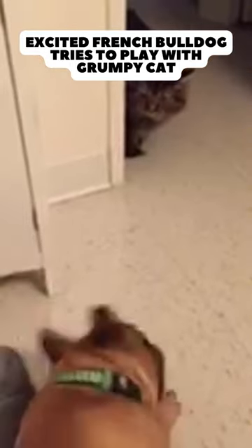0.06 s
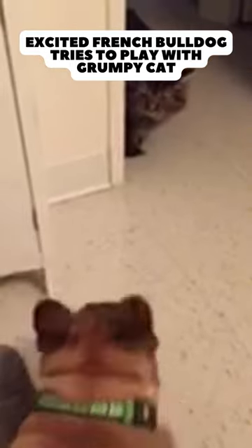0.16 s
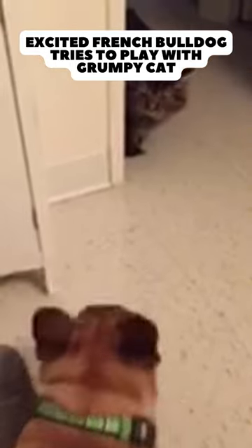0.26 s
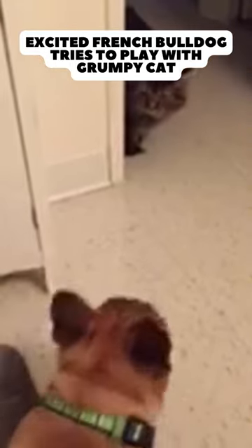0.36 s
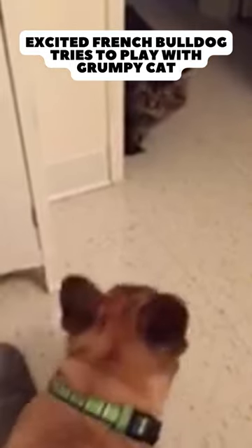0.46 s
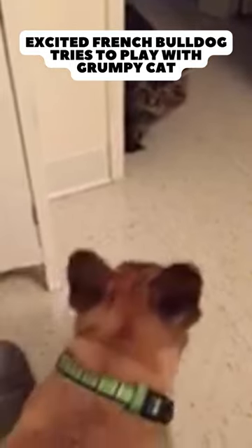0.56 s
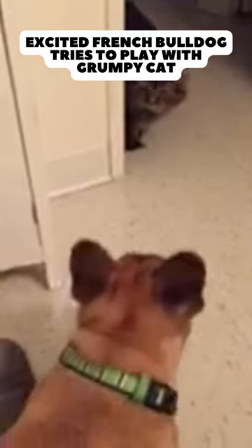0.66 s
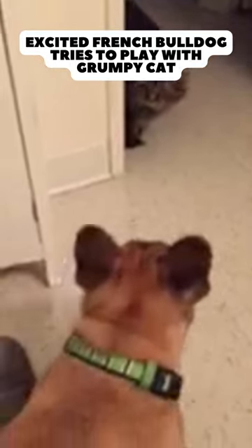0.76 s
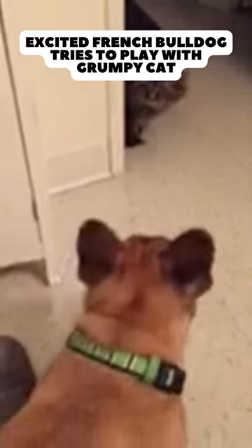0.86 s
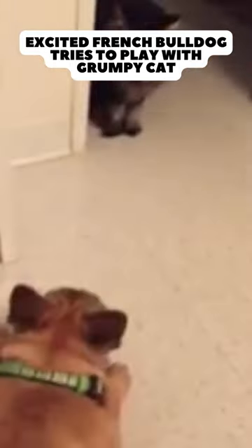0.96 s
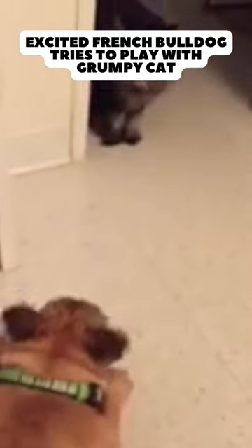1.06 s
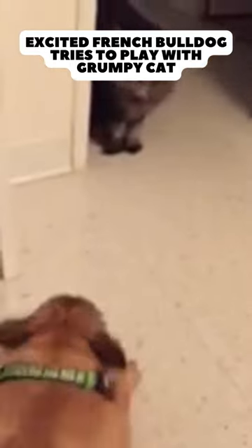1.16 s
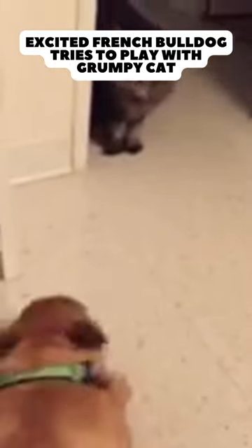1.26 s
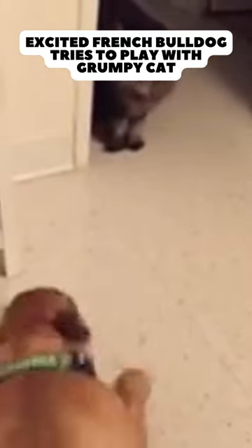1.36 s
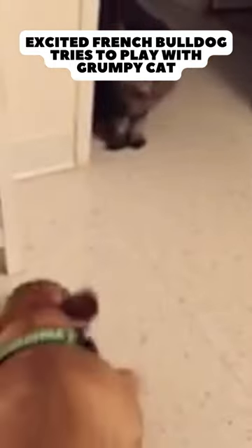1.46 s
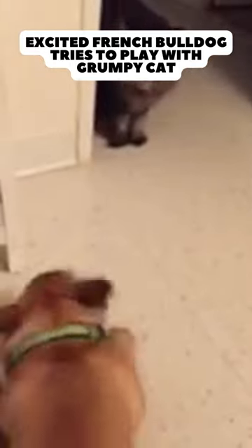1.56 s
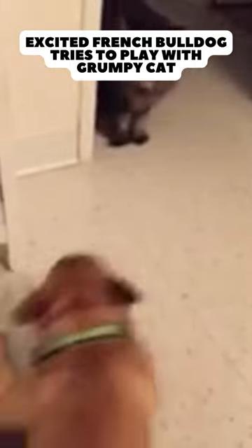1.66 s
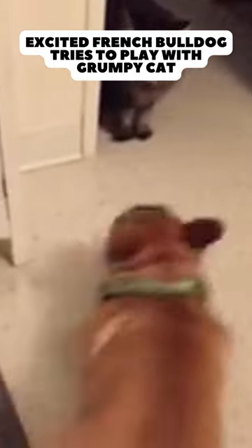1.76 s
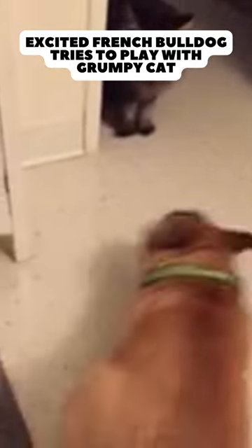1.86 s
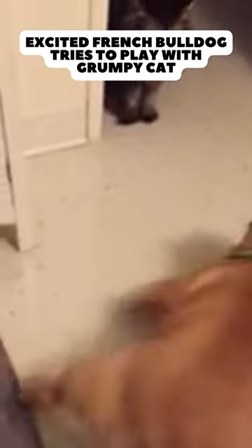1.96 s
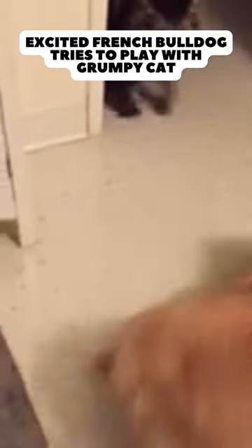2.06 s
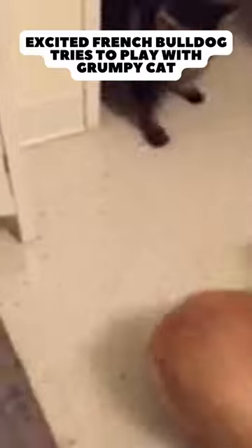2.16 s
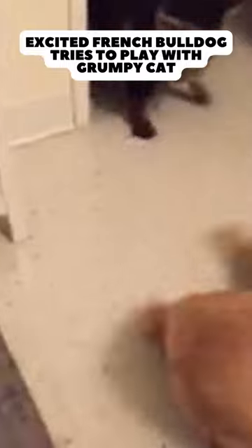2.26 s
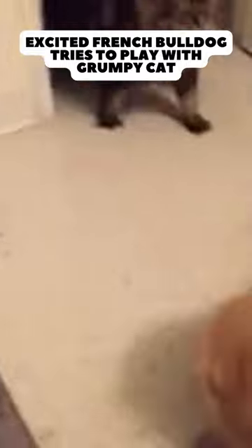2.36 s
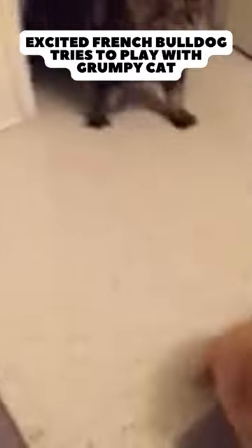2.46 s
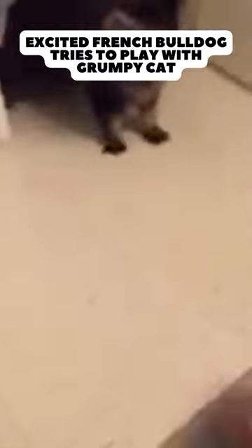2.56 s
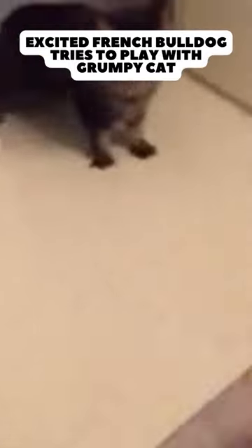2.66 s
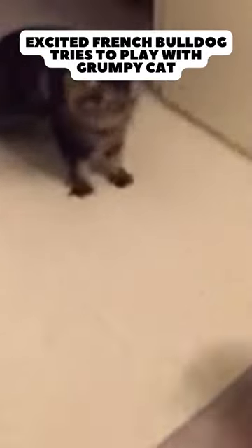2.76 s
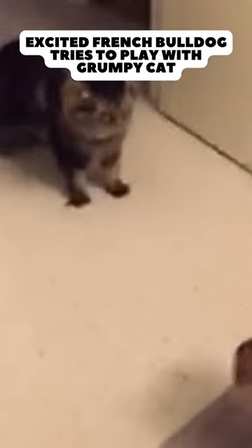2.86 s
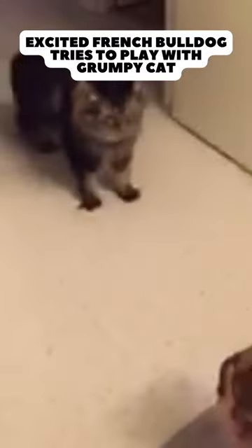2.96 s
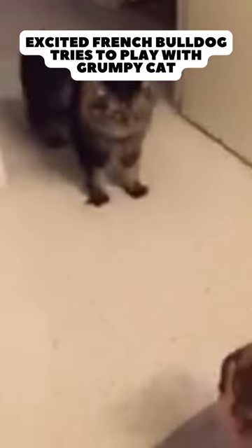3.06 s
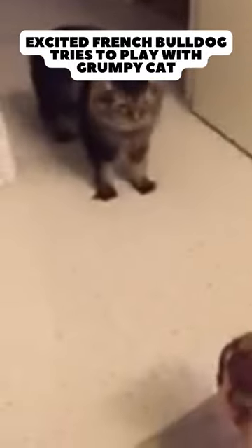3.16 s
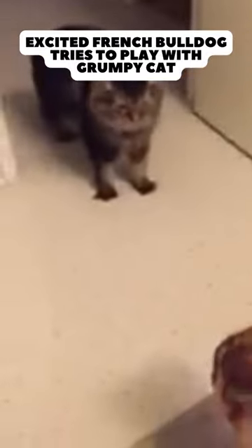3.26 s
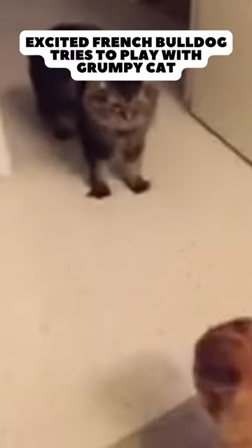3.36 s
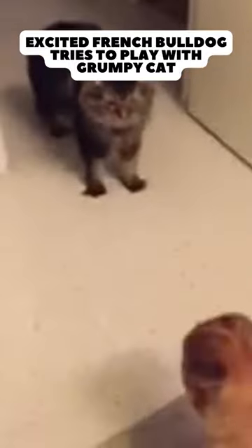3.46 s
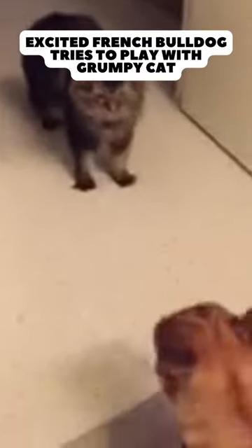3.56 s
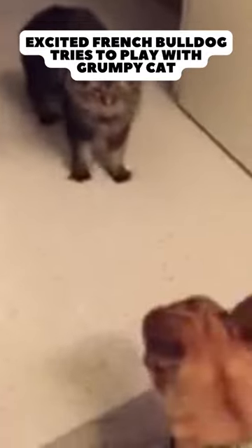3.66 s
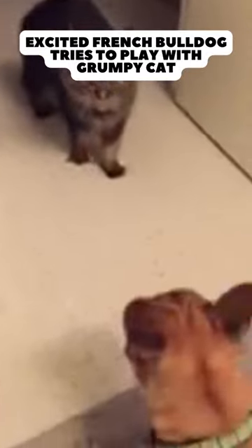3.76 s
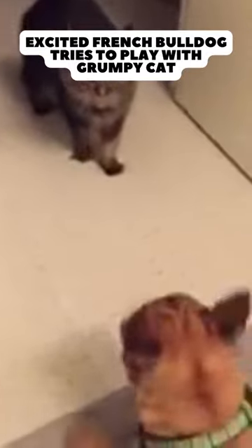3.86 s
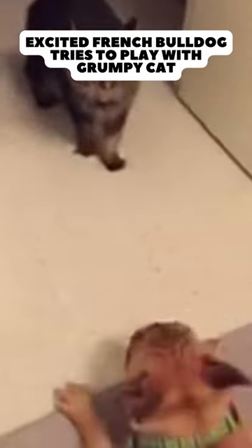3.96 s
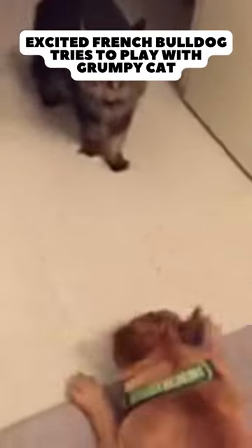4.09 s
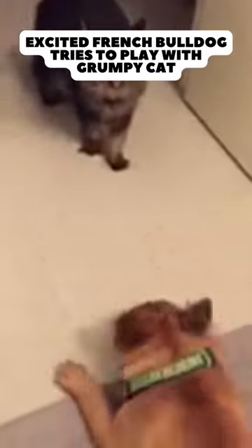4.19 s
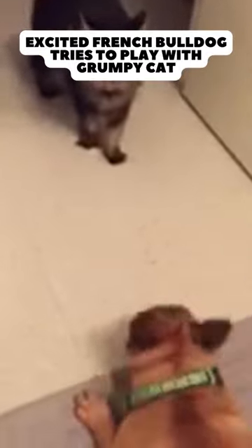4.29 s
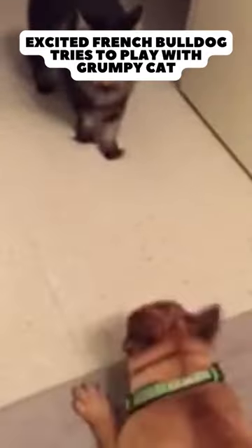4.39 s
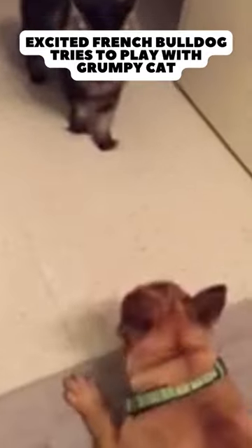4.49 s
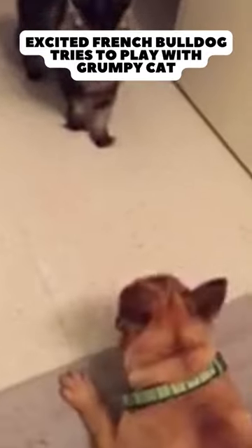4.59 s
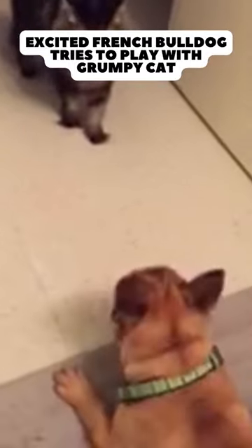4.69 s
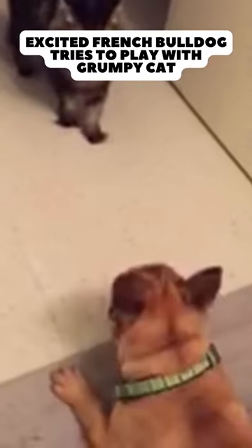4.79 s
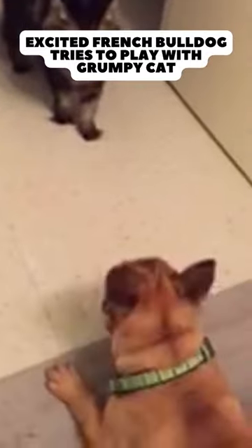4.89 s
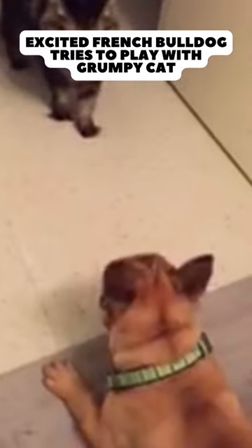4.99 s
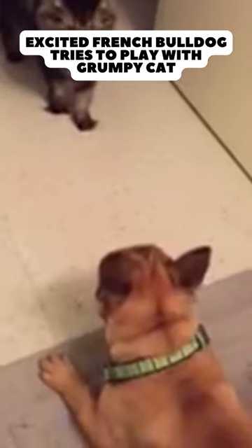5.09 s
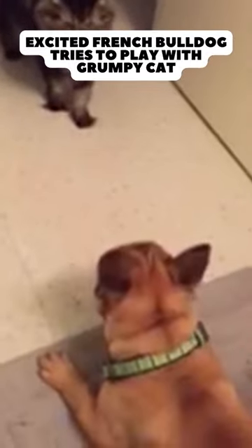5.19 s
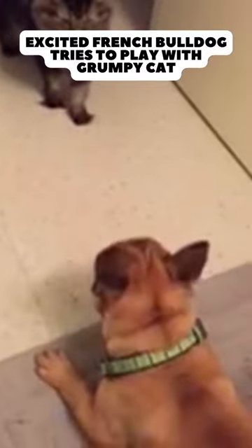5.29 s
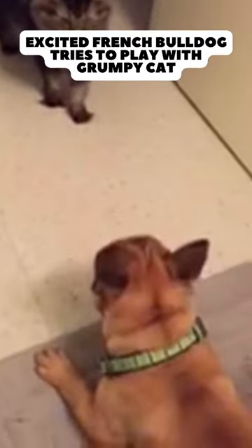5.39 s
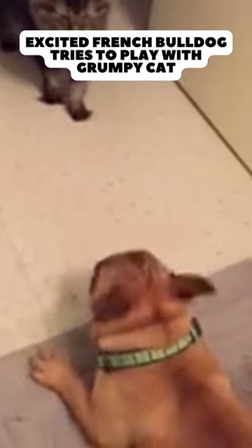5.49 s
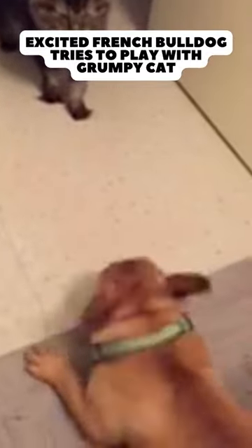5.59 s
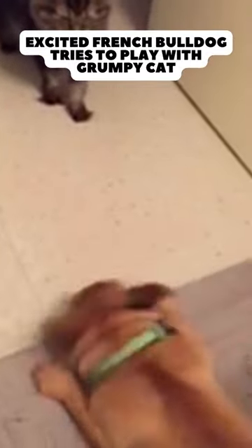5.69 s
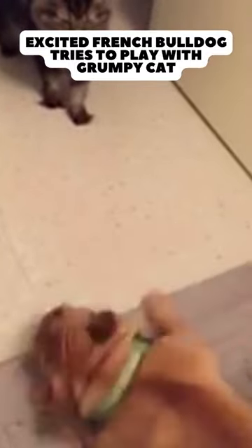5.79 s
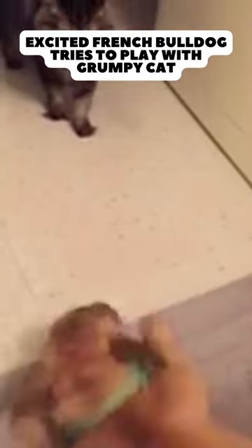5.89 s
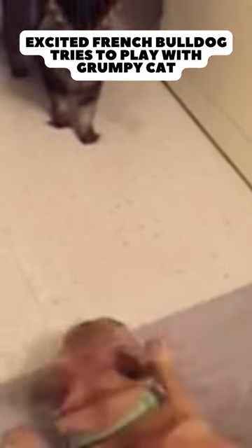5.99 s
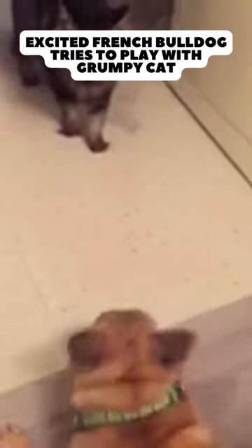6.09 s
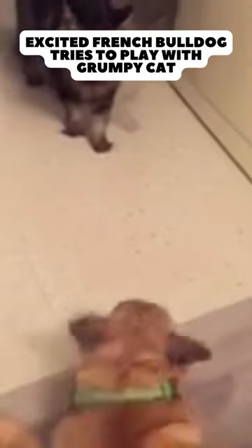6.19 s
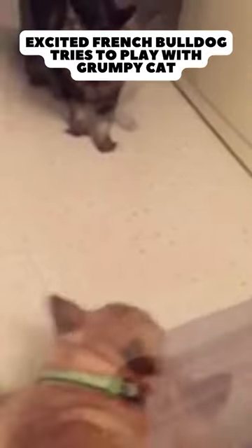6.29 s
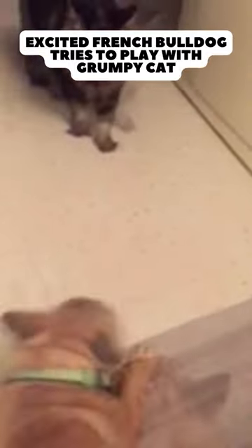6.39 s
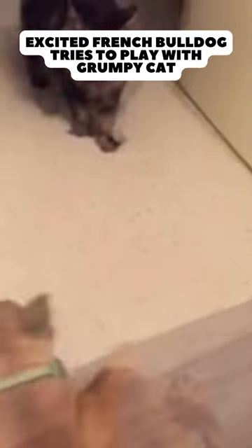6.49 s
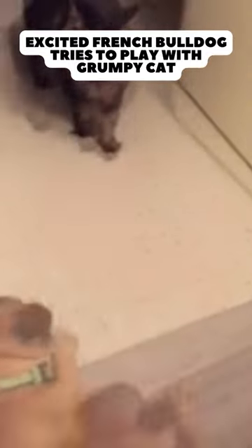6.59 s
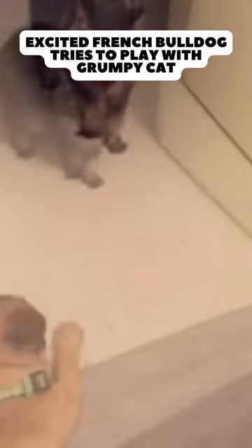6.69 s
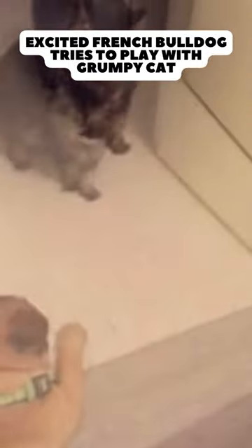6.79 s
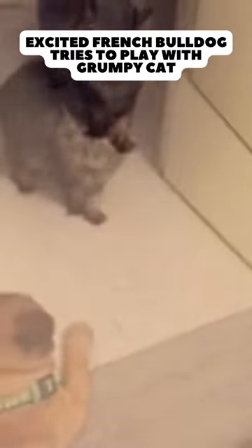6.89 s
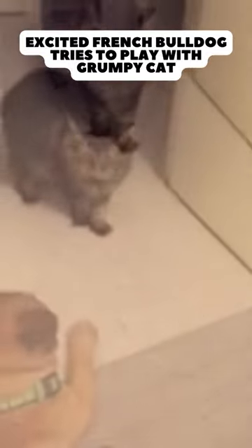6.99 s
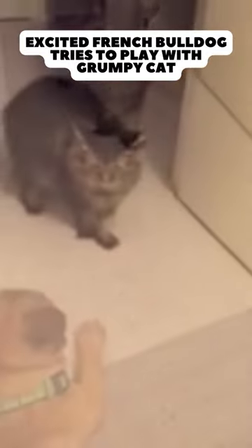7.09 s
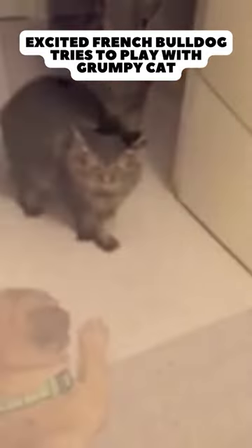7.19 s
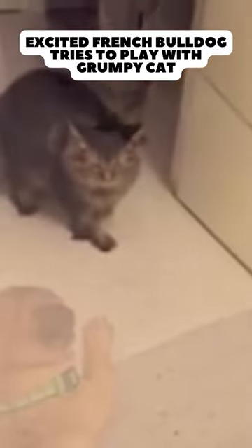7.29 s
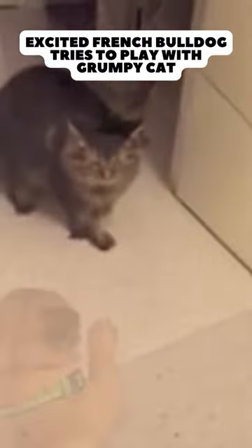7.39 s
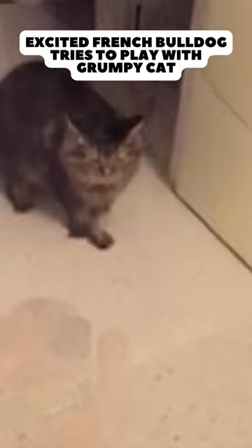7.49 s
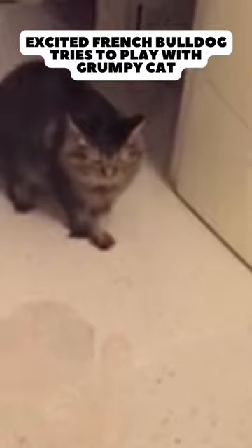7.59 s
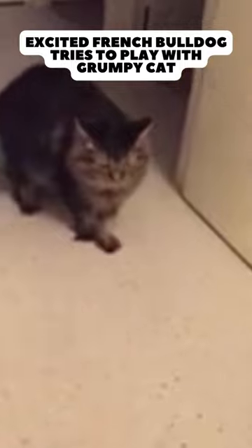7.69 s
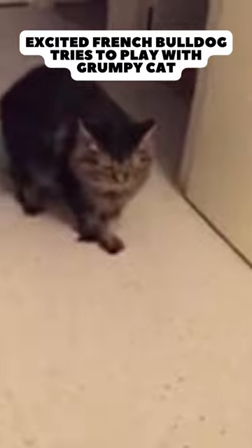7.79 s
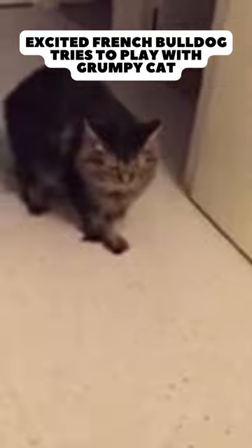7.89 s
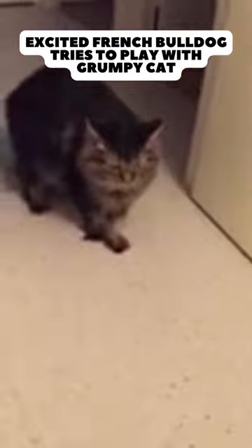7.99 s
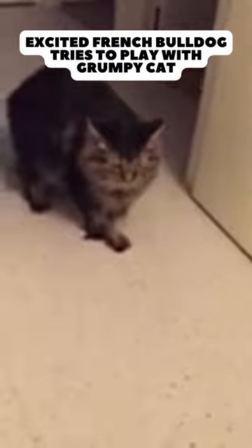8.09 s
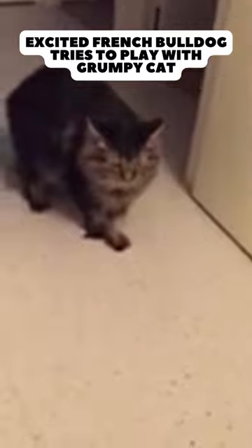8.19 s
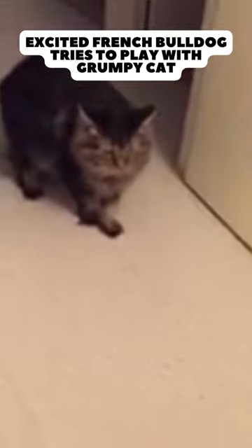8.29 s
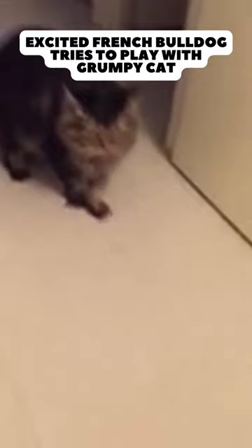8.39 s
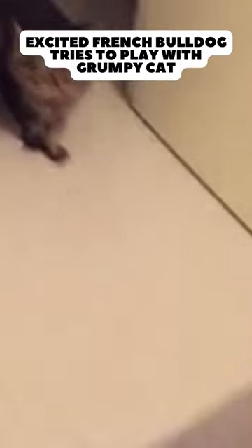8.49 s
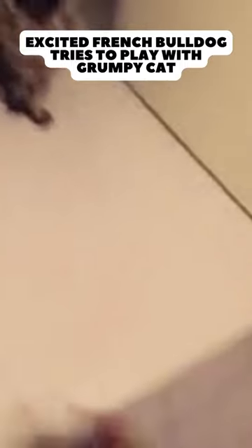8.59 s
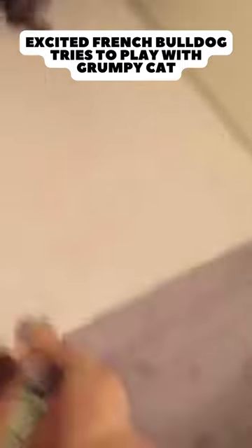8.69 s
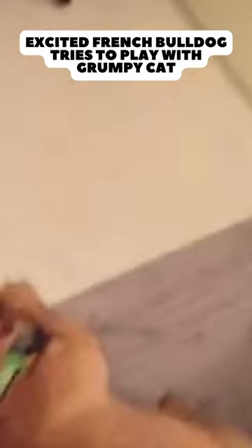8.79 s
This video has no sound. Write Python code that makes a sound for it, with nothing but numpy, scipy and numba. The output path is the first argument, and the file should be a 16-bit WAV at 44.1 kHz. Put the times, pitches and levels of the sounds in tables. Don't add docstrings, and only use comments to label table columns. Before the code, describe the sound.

Handheld phone capture indoors with short hard reflections: near, dry dog woofs, ragged huffs, a yap and scrabbling claws, then one wetter, distant cat yowl sliding down. A calm middle holds only soft nose whistles, sniffs and small whimpers. Then a loud bark, grumbles, a woof with paws slapping the floor, another bark, snorts, a brief low cat growl and closing woofs and yap, with a thin fridge whine rising.

```python
import sys
import numpy as np
from scipy import signal
from scipy.fft import rfft, irfft, next_fast_len
from scipy.io import wavfile
from scipy.ndimage import uniform_filter1d
from numba import njit

SR = 44100
rng = np.random.default_rng(int(sys.argv[2]) if len(sys.argv) > 2 else 0)


def put_to_file(sound):
    columns = np.atleast_2d(sound).T
    safe = np.clip(columns, -1, 1)
    whole_steps = np.round(safe * 32767)
    wavfile.write(sys.argv[1], SR, whole_steps.astype(np.int16))


def undo_db(level):
    steps = np.asarray(level, float) / 20
    return 10 ** steps


N = 390285
T = np.arange(N) / SR
M = next_fast_len(N)

# (frequency [Hz], density [dB per Hz])
HISS = [(1590, -28), (2700, -1.5), (3600, -3.5), (3850, -5.5), (4350, -9.5), (5600, -6), (6080, -11.5),
        (6690, -10.5), (11800, -21), (13800, -20)]


def level(x, db):
    return x * undo_db(db) / np.sqrt(np.mean(x ** 2))


def coloured(points):
    hz, db = np.transpose(points)
    f = np.fft.rfftfreq(M, 1 / SR) + 1
    gain = undo_db(np.interp(np.log(f), np.log(hz), db))
    return level(irfft(rfft(rng.standard_normal(M)) * gain, M)[:N], 0)


def walk(rate):
    k = int(SR / rate)
    held = np.repeat(rng.standard_normal(N // k + 1), k)
    return 1.4 * uniform_filter1d(uniform_filter1d(held, k), k)[:N]


def patchy(x, lo_hz, depth_db, rate, count=7):
    spectrum = rfft(x, M)
    octaves = np.log2(np.fft.rfftfreq(M, 1 / SR) / lo_hz + 1e-9)
    out = 0
    for k in range(count):
        share = np.clip(1 - abs(np.clip(4 * octaves, 0, count - 1) - k), 0, 1)
        out = out + undo_db(depth_db * walk(rate)) * irfft(spectrum * share, M)[:N]
    return level(out, 0)


def play(table):
    s, *columns = np.transpose(table)
    gate = np.clip(np.minimum(T - s[0] + 0.033, s[-1] + .01 - T) / 0.022, 0, 1)
    return gate, [np.interp(T, s, c) for c in columns]


@njit
def svf(x, hz, width):
    y, b, l = np.empty(len(x)), 0., 0.
    for i in range(len(x)):
        g, k = np.tan(np.pi * hz[i] / SR), width / hz[i]
        v = (b + g * (x[i] - l)) / (1 + g * (g + k))
        b, l, y[i] = 2 * v - b, l + 2 * g * v, k * v
    return y


def steep(x, hz, width):
    return level(svf(svf(x, hz, width), hz, width), 0)


def tones(table):
    out = 0
    for s, long, hz, db in table:
        swell = np.sin(np.pi * np.clip((T - s) / long, 0, 1)) ** 0.18
        out = out + undo_db(db) * swell * np.sin(2 * np.pi * hz * T)
    return out


@njit
def walls(x, lags, gain, damp):
    line, soft, out = np.zeros((8, 4096)), np.zeros(8), np.zeros(len(x))
    for i in range(len(x)):
        total = 0.
        for k in range(8):
            soft[k] += (1 - damp) * (gain[k] * line[k, (i - lags[k]) & 4095] - soft[k])
            total += soft[k]
        out[i] = soft[0] - soft[3] + soft[5] - soft[6]
        for k in range(8):
            line[k, i & 4095] = x[i] + soft[k] - total / 4
    return out


def kitchen():
    # (frequency [Hz], density [dB per Hz])
    hush_spectrum = [(15, -28.5), (25, -6.5), (91, 5.5), (126, -2), (160, -4), (271, -4.5), (344, -8.5),
                     (372, -7), (741, -14), (1070, -16.5), (1820, -15.5), (2250, -19.5), (14000, -33)]
    # (time [s], level [dB])
    whine_curve = [(0, -92), (7.4, -89.5), (7.75, -83), (8.85, -71)]
    hush = patchy(coloured(hush_spectrum), 100, 2, 10, count=10)
    hush = level(hush * undo_db(np.interp(T, [1.1, 2.5], [-3, 0])), -63.5)
    fridge_hz, flicker_db, flicker_rate = 5544, 3, 25
    whine = np.sin(2 * np.pi * fridge_hz * T + 3 * walk(6))
    whine = whine + .5 * steep(rng.standard_normal(N), 11300 + 0 * T, 900.)
    whine_db = np.interp(T, *np.transpose(whine_curve)) + flicker_db * walk(flicker_rate)
    return hush + undo_db(whine_db) * whine


def paws():
    # (time [s], peak level [dB], thud over claw [dB])
    steps = [(0.3766, -36.5, -5.5), (0.425, -43.5, 0.5), (1.791, -23, -10), (2.0293, -5.5, -33),
             (2.234, -9, -28), (3.1631, -61, -1.5), (3.3263, -53.5, -13), (5.5985, -38.5, -8.5),
             (5.68, -19.5, -41), (6.5144, -19, -20.5), (6.5908, -8.5, -12)]
    t = T[:SR // 4]
    out = np.zeros(N + len(t))
    for s, db, thud_db in steps:
        claw = rng.standard_normal(len(t)) * (np.exp(-t / 0.0026) + 0.61 * np.exp(-t / 0.052))
        thud = np.sin(2 * np.pi * 140 * t) * np.exp(-t / 0.041)
        thud = thud + 2.3 * np.sin(2 * np.pi * 215 * t) * np.exp(-t / .02)
        start = int(s * SR)
        out[start:start + len(t)] += undo_db(db - 21) * claw + undo_db(db + thud_db + 0.5) * thud
    return out[:N]


def cat_growl():
    # (time [s], pitch [Hz], level [dB])
    growl_curve = [
        (8.2, 182.3, -72),
        (8.268, 184, -65),
        (8.294, 183.3, -58),
        (8.44, 184.5, -57.5),
    ]
    # (multiple of the pitch [1], level [dB])
    orders = [(1, -4.5), (2, -6), (3, -11), (4, -1), (5, -7), (6, -14), (7, -28), (8, -1.5), (9, -26),
              (10, -17)]
    gate, (hz, db) = play(growl_curve)
    phase = 2 * np.pi * np.cumsum(hz * (1 + 0.00583 * walk(69))) / SR
    hum = 0
    for k, order_db in orders:
        hum = hum + undo_db(order_db + 5 * walk(18)) * np.sin(k * phase + k * k)
    breath = steep(rng.standard_normal(N), 750 + 0 * T, 1060.0)
    return gate * undo_db(db) * (level(hum, -2.4) + undo_db(-9) * breath)


def cat_cry():
    # (time [s], pitch [Hz], low harmonics [dB], open-mouth harmonics over low [dB])
    cry_curve = [
        (2.3, 444.2, -34.5, -8),
        (2.35, 446.3, -36, 19.5),
        (2.43, 503.3, -38.5, 30),
        (2.5, 503.7, -35, 23.5),
        (2.6, 469.2, -38, 24),
        (2.72, 437.5, -44, 6.5),
        (2.92, 367.7, -48.5, -1.5),
        (3.112, 274.7, -54, -16),
        (3.28, 167, -61.5, -40),
    ]
    # (frequency [Hz], level [dB])
    mouth_response = [(710, -41.5), (1200, -14.5), (1490, -16.5), (1880, 1.5), (2100, -16.5), (2370, -8.5),
                      (3050, -13.5), (4730, -35), (6130, -49.5), (7000, -44.5), (9100, -82)]
    # (time [s], share lost [0-1])
    fray_curve = [(2.3, 1), (2.42, .85), (2.5, .06), (2.74, .08), (2.9, .7), (3.3, 1)]
    gate, (hz, low_db, open_db) = play(cry_curve)
    phase = 2 * np.pi * np.cumsum(hz * (1 + 0.0029 * walk(60))) / SR
    fray = np.interp(T, *np.transpose(fray_curve))
    mouth_hz, mouth_db = np.transpose(mouth_response)

    breath_db = -12 + 0.09 * open_db
    above = signal.butter(4, 3900, "high", fs=SR, output="sos")
    breath = patchy(signal.sosfilt(above, coloured(HISS)), 6600, 6.3, 54, count=5)
    out = undo_db(breath_db - 5.5) * breath
    mouth_rasp = patchy(steep(rng.standard_normal(N), 2580 + 0 * T, 1500.0), 1300, 4.5, 18, count=6)
    out = out + fray * undo_db(open_db - 3.5) * mouth_rasp
    out = out + fray * undo_db(-10) * steep(rng.standard_normal(N), 650 + 0 * T, 900.)

    for k in range(1, 14):
        throat_db = np.interp(k * hz, [180, 420, 500, 900, 1200, 1500], [-0.5, -27, -6.5, -4, -5, -28.0])
        low = undo_db(throat_db - 7.4 * max(k - 2, 0) * fray)
        high = undo_db(open_db + np.interp(k * hz, mouth_hz, mouth_db, left=-60) - 1.5 - 1.2 * k * fray)
        shimmer = undo_db((.8 + .3 * k) * walk(28))
        jitter = k * (.025 + .09 * fray) * walk(140)
        out = out + (low + high) * shimmer * np.sin(k * phase + k * k + jitter)
    return gate * undo_db(low_db) * out


def nose():
    # (time [s], length [s], frequency [Hz], level [dB])
    whistles = [(.725, 0.045, 1700, -65), (3.33, 0.046, 1980, -65), (3.55, 0.039, 1810, -68),
                (3.889, 0.045, 1580, -63.5), (3.92, 0.046, 1884, -67), (3.94, 0.031, 1280, -63),
                (5.35, 0.14, 1680, -68.5), (5.38, 0.045, 1320, -67)]
    # (time [s], length [s], frequency [Hz], level [dB])
    grunts = [(1.21, 0.03, 197.3, -23), (1.33, 0.012, 196, -26), (6.545, 0.085, 331, -18.5),
              (6.85, 0.068, 318.3, -38.5), (8.63, 0.059, 374, -32), (8.772, 0.048, 305, -21.5)]
    return tones(whistles) + tones(grunts)


def folds(hz, jitter, scatter_db, air):
    chance = rng.standard_normal((N // 60, 2))
    starts = np.cumsum(np.exp(jitter * chance[:, 0]))
    cycles = hz * T
    index = np.searchsorted(starts, cycles)
    force = undo_db(scatter_db * chance[index, 1])
    slaps = np.diff(index, prepend=0) * force
    puff = force * (.8 + np.exp(-(cycles - starts[index - 1]).clip(0) / 0.31))
    return level(slaps, 0) + air * level(puff * rng.standard_normal(N), 0), level(puff, 0)


def effort():
    # (time at full strength [s], hold [s], throat level [dB],
    # throat resonance [Hz], mouth over throat [dB])
    barks = [
        (5.894, 0.072, -9.5, 1076, -1),
        (7.146, 0.069, -10, 1113, -4),
    ]
    yaps = [(1.457, 0.079, -14.5, 1120, -8), (7.126, .015, -13.5, 1228, -12.5), (8.775, .09, -15, 1126, -8)]
    woofs = [(.14, 0.056, -17.5, 1155, -11), (1.2, 0.056, -20, 1159, -18.5),
             (2.325, 0.083, -21.5, 1239, 6.5), (5.645, 0.055, -30.5, 1352, 3.5),
             (6.55, 0.15, -18, 995, 3.5), (8.5, 0.05, -27, 1374, -6.5), (8.56, 0.018, -21.5, 1322, 2.5)]
    huffs = [(1.32, .07, -28.5, 1112, -2), (1.72, 0.047, -36, 1119, -1), (1.8, .08, -28.5, 1366, -2.5),
             (1.95, 0.038, -33, 1060, -11.5), (2.05, .085, -30.5, 1408, -18.5)]
    grumbles = [(.01, .11, -37, 1180, -8.5), (6.24, .09, -38.5, 1001, -6), (6.37, .09, -36, 1324, -0.5),
                (6.48, 0.044, -31, 1026, -4.5), (6.87, .04, -34, 1051, -15), (6.945, .12, -31, 1165, -5.5),
                (8.64, 0.082, -32, 1080, -37)]
    snorts = [(.376, 0.054, -37, 1449, -8), (7.43, .05, -45.5, 1314, 2.5), (7.495, .05, -37.5, 1191, -4.5),
              (7.57, 0.034, -49.5, 1139, -11.5)]
    whimpers = [(4.175, .05, -35.5, 1053, -5), (4.28, .13, -45.5, 1213, -24), (4.43, .09, -36, 1131, 1)]
    sniffs = [(1.65, 0.054, -46, 1310, -23), (2.025, 0.017, -48, 1093, -5), (2.23, 0.031, -49.5, 1140, -2),
              (3.97, 0.053, -66, 1188, 4), (4.09, 0.049, -52.5, 1094, 4), (4.37, .035, -53, 1150, 6),
              (5.6, 0.018, -51.5, 1250, -0.5), (5.82, .05, -60.5, 1200, -6)]
    # (calls, swell [dB/s], fade [dB/s], jaw travel [0-1], mouth resonance [Hz],
    # chest over throat [dB], chest resonance [Hz], hiss over throat [dB])
    kinds = [(barks, 5900, 270, 1., 1900, -14, 430, -12.5),
             (yaps, 7000, 400, 0.12, 2100, -5, 260, -8),
             (woofs, 600, 260, 0.74, 1800, -8.5, 300, -9.5),
             (huffs, 300, 540, .3, 2050, -5, 200, -6.5),
             (grumbles, 320, 350, 0.34, 2050, -4, 290, -9),
             (snorts, 700, 160, .2, 2000, -5.5, 130, -11.5),
             (whimpers, 890, 650, 0.18, 1600, -27, 180, -12),
             (sniffs, 600, 590, .2, 680, -1, 170, 6.3)]
    burst_db, burst_s, sharp_db_s = 1, 0.06, 4001
    throat_sink, mouth_lift, mouth_opens_db, hiss_calms_db = .3, .33, 10, 3.5
    mouth_shuts_db_s, hiss_lingers_db_s = 81.5, 49.5
    chest_lag, usual_db = 0.68, -29

    t = np.arange(0, N / SR + .002, .001)
    power, shape = 1e-12, 0
    for calls, swell, fade, jaw, mouth_hz, chest_db, chest_hz, hiss_db in kinds:
        for s, hold, db, throat_hz, mouth_db in calls:
            ended = t - s - hold
            burst = min(swell / sharp_db_s, 1) * burst_db * np.exp(-(t - s).clip(0) / burst_s)
            strength = undo_db(db - swell * (s - t).clip(0) - fade * ended.clip(0) + burst) ** 2
            travel = jaw * (((t - s) / hold).clip(0, 1.2) - .5)
            posture = np.array([
                throat_hz * (1 - throat_sink * travel),
                mouth_db + mouth_opens_db * travel - mouth_shuts_db_s * ended.clip(0, .2),
                mouth_hz * (1 + mouth_lift * travel),
                chest_db - chest_lag * max(db - usual_db, 0) + 0 * t,
                chest_hz + 0 * t,
                hiss_db - hiss_calms_db * travel + hiss_lingers_db_s * ended.clip(0, .15),
                1 + 0 * t])
            power = power + strength
            shape = shape + (strength + 1e-14) * posture
    return [np.interp(T, t, c) for c in [np.sqrt(power), *(shape[:-1] / shape[-1])]]


def dog():
    gate, throat_hz, mouth_db, mouth_hz, chest_db, chest_hz, hiss_db = effort()
    source, puff = folds(189.87, .3, 2.5, 1.5)
    wander = .03

    throat = steep(source, throat_hz * (1 + wander * walk(35)), 380.)
    throat = throat + patchy(steep(source, .9 * throat_hz, 1300.), 500, 4, 30)
    mouth = steep(source, mouth_hz * (1 + wander * walk(35)), 350.)
    mouth = mouth + .9 * patchy(steep(source, .94 * mouth_hz, 1400.), 1300, 4, 30, count=5)
    chest = steep(source, chest_hz * (1 + 5 * wander * walk(20)), 120.)
    chest = chest + patchy(steep(source, 200 + 0 * T, 520.), 70, 3.5, 14, count=4)
    hiss = patchy((.8 + .3 * puff) * coloured(HISS), 2800, 4, 22, count=9)

    voiced = level(throat, 0.65) + undo_db(mouth_db) * level(mouth, -4.4) + undo_db(chest_db) * level(chest, -1.9)
    voiced = signal.sosfilt(signal.ellip(5, 1, 35, 2620, fs=SR, output="sos"), voiced)
    return gate * (voiced + undo_db(hiss_db - 1.0) * hiss)


def scene():
    near = dog() + paws() + nose()
    far = cat_cry() + cat_growl()
    room_t60_s, room_damp = .33, .45
    lags = rng.integers(400, 1900, 8)
    sent = undo_db(-9.0) * near + undo_db(-2.0) * far + 1e-18
    room = walls(sent, lags, undo_db(-60 * lags / SR / room_t60_s), room_damp)
    return (near + undo_db(4.5) * far + room + kitchen())[None]


def top_cut(x):
    return signal.sosfilt(signal.butter(12, 15660, fs=SR, output="sos"), x)


def record(dry):
    dry = signal.sosfilt(signal.butter(2, 48, "high", fs=SR, output="sos"), dry)
    dry = signal.sosfilt(signal.ellip(10, .2, 60, 13850, fs=SR, output="sos"), dry)
    rounded = .96 * np.tanh(1.15 * dry)
    return top_cut(rounded)


dry = scene()
out = record(dry)
put_to_file(out)
```